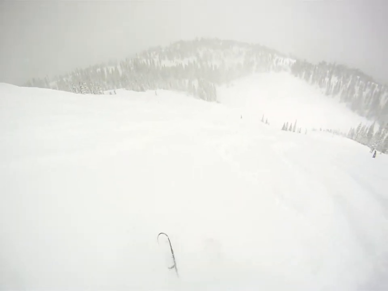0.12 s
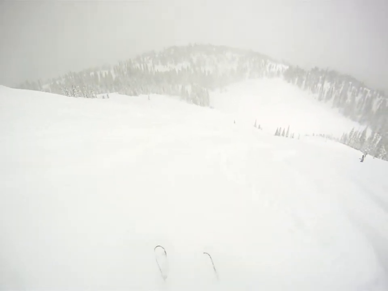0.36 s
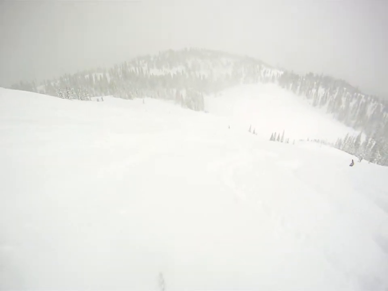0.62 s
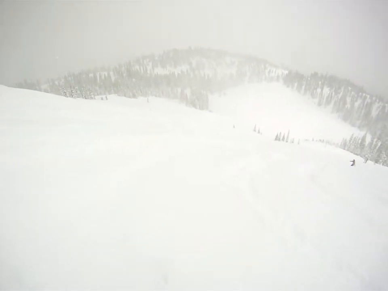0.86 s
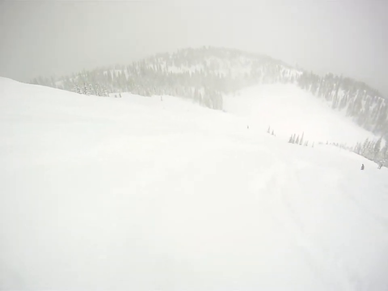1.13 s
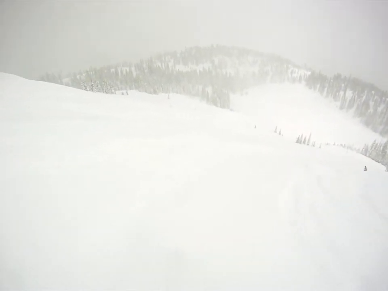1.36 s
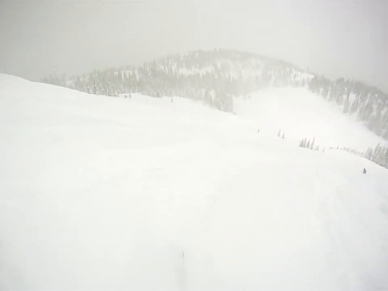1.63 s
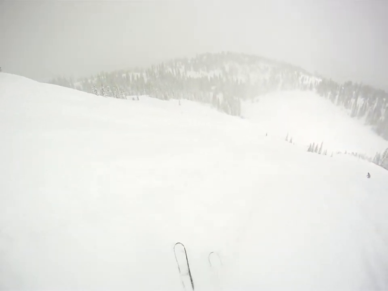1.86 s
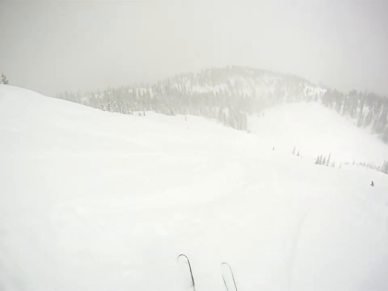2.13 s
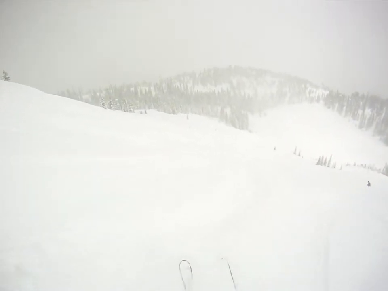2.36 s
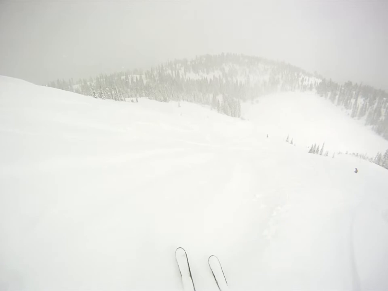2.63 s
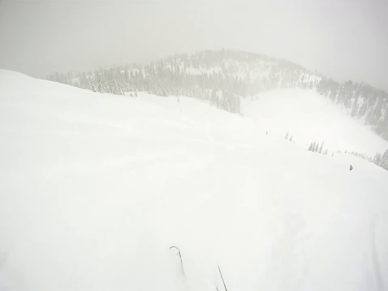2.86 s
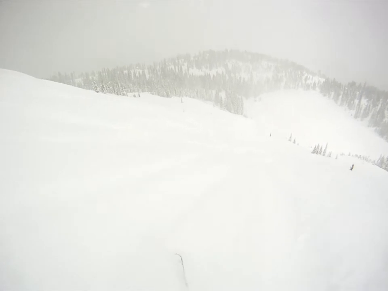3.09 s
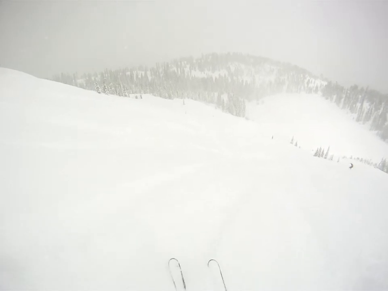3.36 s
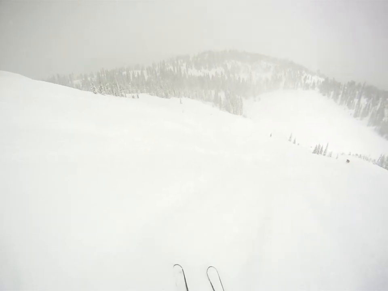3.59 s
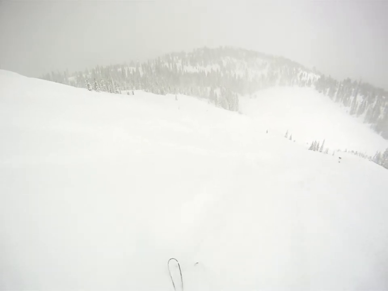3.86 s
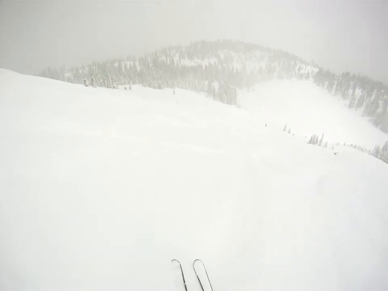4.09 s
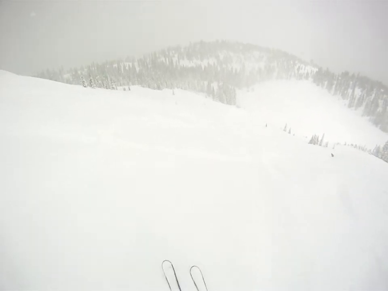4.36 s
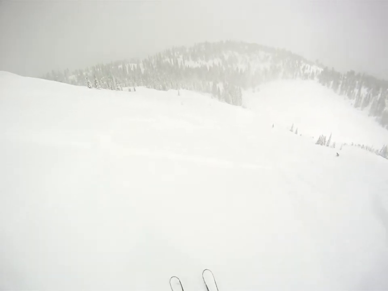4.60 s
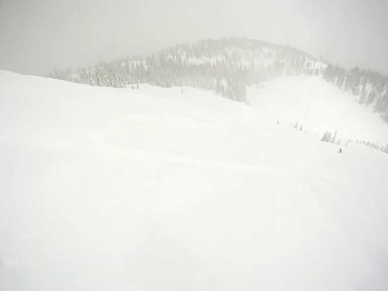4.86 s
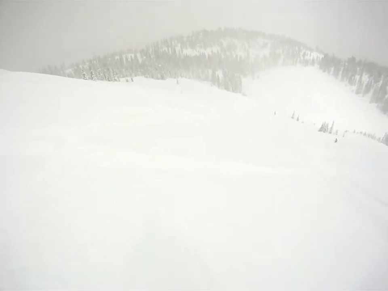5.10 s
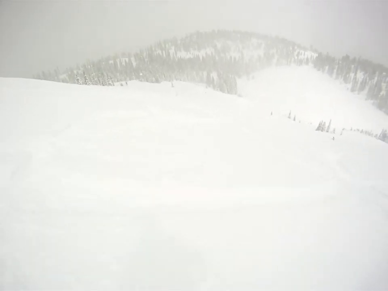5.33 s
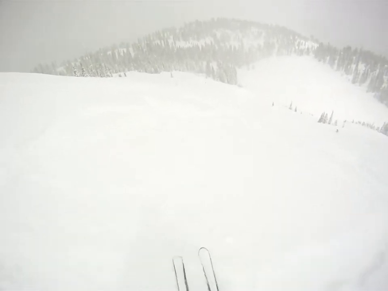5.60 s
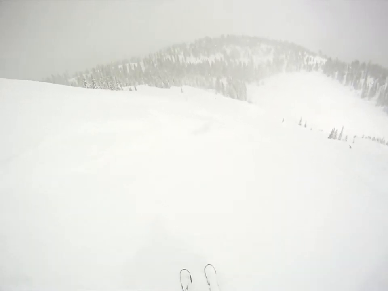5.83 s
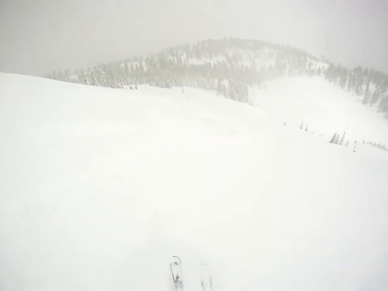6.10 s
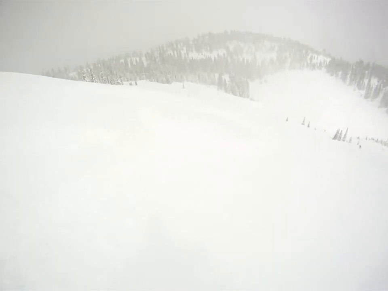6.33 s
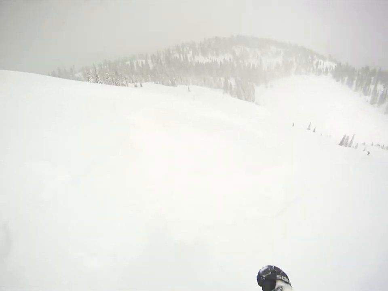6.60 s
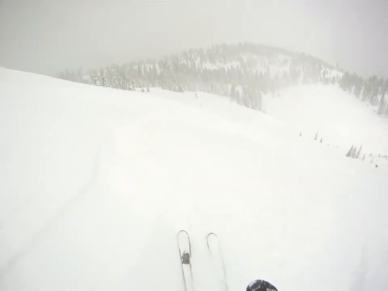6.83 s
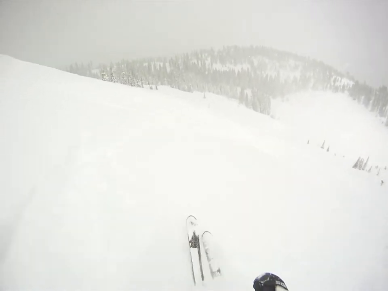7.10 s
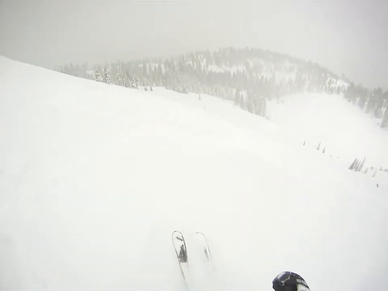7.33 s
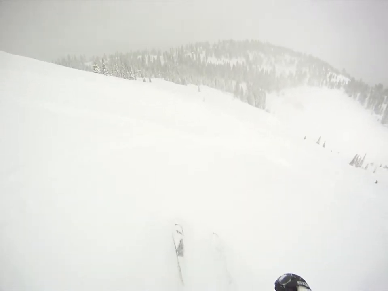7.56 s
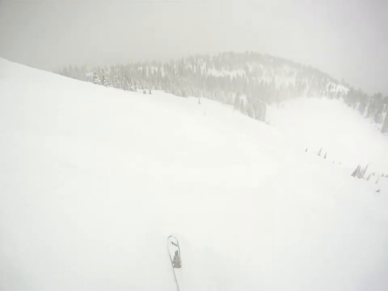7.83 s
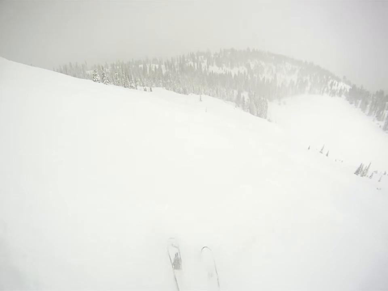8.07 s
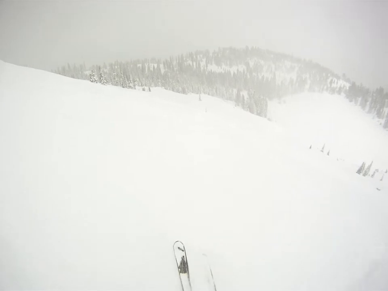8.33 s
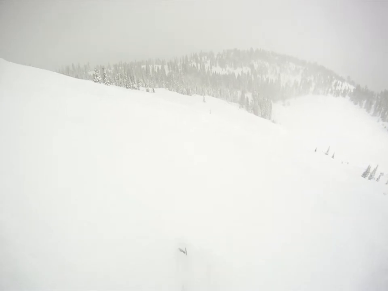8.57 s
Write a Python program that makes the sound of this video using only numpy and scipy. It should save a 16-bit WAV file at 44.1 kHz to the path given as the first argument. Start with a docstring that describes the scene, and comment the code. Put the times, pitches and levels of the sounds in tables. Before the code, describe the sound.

Skiing through deep powder heard from inside a plastic case: thin boxy wind hiss, low buffeting, and crackling snow hits that intensify after five seconds.

```python
"""Rushing air shakes a small plastic case with a microphone shut in it, on a fast ski run in deep powder.
The air gives a low rumble, from noise, and a hiss, from noise through the resonant modes of the shell.
Flying snow patters, ticks and thuds: short pushes ring the same modes; blunt lumps jolt the whole case.
The sound is sampled at 12 kHz and each sample is held, which mirrors it into the treble."""
import sys
import numpy as np
from scipy import signal
from scipy.fft import rfft, irfft
from scipy.io import wavfile

SR = 44100
rng = np.random.default_rng(int(sys.argv[2]) if len(sys.argv) > 2 else 0)


def to_linear_factor(level_db):
    """Convert decibel levels (scalar or array-like) to linear amplitude factors."""
    exponent = np.asarray(level_db, float) / 20
    return 10 ** exponent


def to_wav(sig):
    """Store sig (one row per channel, or 1-D mono) as 16-bit WAV at the path in sys.argv[1].

    Samples outside -1..1 are clipped; the rate is SR.
    """
    pcm = np.clip(np.atleast_2d(sig), -1, 1) * 32767
    pcm = np.round(pcm).astype(np.int16)
    wavfile.write(sys.argv[1], SR, pcm.T)  # frames by channels


N = 383669

# rumble over the run, before gusts: start_s, level_db
RUMBLE_LEVEL = [(0, -48.5), (1.0, -49.5), (2.0, -51), (3.0, -52), (3.7, -48.5), (4.2, -50.5), (5.0, -42),
                (5.5, -44.5), (6.15, -39), (6.8, -42.5), (7.2, -44.5), (7.5, -43), (8.0, -45), (8.5, -43.5),
                (8.7, -45.5)]
# buffeting air spectrum: pitch_hz, gain_db on white noise
BUFFET_SPECTRUM = [(4, -5), (15, -5), (30, -3), (70, -5.5), (140, -10.5), (250, -21), (400, -33.5),
                   (800, -36), (1500, -60)]
# air flow over the run, before AIR_COUPLING_DB: start_s, hiss_db (middle, deep, low), upper_hiss_db (upper, top)
AIR_FLOW = [(0, -47.5, -58), (0.45, -49.5, -60.5), (0.95, -49, -59), (1.72, -52, -57.5), (2.3, -51, -56.5),
            (2.6, -53, -67), (3.25, -55, -63.5), (3.8, -50, -59), (4.3, -47.5, -57), (4.65, -45, -50),
            (4.97, -38.5, -43.5), (5.3, -39.5, -47.5), (5.65, -41.5, -53), (5.98, -36.5, -40),
            (6.18, -38.5, -44), (6.78, -37.5, -43), (7.17, -39.5, -42), (7.5, -38.5, -44), (7.8, -41, -43),
            (8.15, -37.5, -42.5), (8.7, -41.5, -47)]
# shell modes in five groups (middle, deep, low, upper, top): pitch_hz, width_hz, gain_db
SHELL_MODES = [
    [(1733, 153, -4.5), (2033, 270, 0), (2274, 200, -2.5)],
    [(400, 740, -23.5), (639, 90, -14.5), (998, 77, -8.5)],
    [(1275, 101, -2.5), (1517, 226, -6.5)],
    [(2860, 150, -10.5), (3453, 545, 1.5), (4156, 63, -12)],
    [(4490, 350, -21), (5025, 580, -9), (5577, 290, -11)],
]
# drive of each group by air: gain_db for middle, deep, low, upper, top
AIR_COUPLING_DB = [13.74, 14.4, 13.83, 10.55, 9]
# drive of each group by small grains, against air: gain_db for middle, deep, low, upper, top
PATTER_COUPLING_DB = [-0.5, -5.0, -1.5, 5, 8.5]
# drive of each group by a lump or tick: gain_db for middle, deep, low, upper, top
STRIKE_COUPLING_DB = [1.44, 6.1, 7.2, 7.16, 8.1]
# hard icy grains, before STRIKE_COUPLING_DB: start_s, upper_level_db, top_db (against upper)
ICE_TICKS = [(0.0206, -43.5, -13), (0.3671, -43, -12), (0.5422, -57, -2), (0.6357, -39.5, -5),
             (0.7665, -40, -11), (0.9917, -40, -11), (1.1539, -37, -26), (1.258, -42.5, -8),
             (1.3383, -45, -16), (1.4383, -42, -15), (1.657, -48, -5), (1.699, -43, -6), (1.7144, -46, -6),
             (1.7402, -42, -7), (1.8896, -45, -16), (1.956, -42, -27), (2.1809, -45.5, -11.5),
             (2.4121, -44, -19), (2.509, -41.5, -15), (2.7874, -43.5, -13), (2.808, -47, -6),
             (2.8574, -44, -13), (2.9432, -46.5, -9), (3.0146, -44.5, -15), (3.481, -45, -15),
             (3.6915, -44.5, -9), (4.081, -46, -1), (4.124, -47.5, 3.5), (4.1604, -42, -7),
             (4.2115, -41.5, -16), (4.4049, -40, -6), (4.5043, -41, -4), (4.5361, -42, -4),
             (4.6578, -37.5, -14), (5.924, -37, -9), (5.9913, -31, -11), (6.238, -35, -17),
             (6.3576, -32, -17), (6.3874, -31, -15), (6.4378, -29.5, -6), (6.4954, -33.5, -4.5),
             (7.2865, -35, -26.5), (7.647, -34, -21.5), (7.9763, -36, -13), (8.2667, -40, 5)]
# tick colour against its upper modes: gain_db for middle, deep, low
TICK_COLOUR_DB = [3.5, -14, -9.5]
# loudest snow lumps, before STRIKE_COUPLING_DB: start_s, middle_level_db, then against it deep_db, low_db, upper_db
LARGE_LUMPS = [(0.1063, -25.5, -23, -16, -7.5), (0.1276, -32.5, -25.5, -6.5, -18),
               (0.166, -30, -20, -18, -7.5), (0.175, -29.5, -16, -12, -15), (0.3186, -34, -13, -19, -3.5),
               (0.4055, -35.5, -9, -20, -5), (0.629, -30.5, -22, -20, -9), (0.7009, -38.5, -1, -13, -6),
               (0.8659, -33, -18, -2.5, -12), (0.9789, -24, -23, -15.5, -8), (1.1054, -35, -15, -10, -8),
               (1.382, -33, -22, -12, -8), (1.6737, -39.5, -2.5, -12, -4), (1.7688, -37, -19, -9, -17),
               (1.8472, -23, -19, -15, -17), (1.9684, -27.5, -34, -19, -10), (2.245, -36.5, -12, -9, -11),
               (2.3266, -29, -14, -7, -14), (2.755, -28, -18, -6, 1.5), (3.0244, -38, -22, -17, -1.5),
               (3.0737, -36, -19, -17, -12), (3.0959, -33.5, -24, -17, -3.5), (3.4276, -33, -23, -16, -12),
               (3.4575, -32, -17, -13, -14), (3.842, -37, -6, -6, -6), (3.906, -28, -27, -20, -12),
               (3.9649, -31, -15, -13, -12), (4.2875, -32, -23, -17, -8), (4.3216, -32, -19, -19, -4.5),
               (4.37, -26, -27, -16, -17), (4.4241, -26, -22, -11, -15), (4.9292, -29.5, -21, -15, -5),
               (5.1047, -21, -20, -19, -19), (5.5702, -22, -34, -20, -18), (5.6186, -24.5, -29, -15, -13),
               (5.8721, -22.5, -33, -24, -25), (5.903, -21.5, -33, -30, -12), (6.0234, -22, -29, -13, -11),
               (6.0495, -29, -18, -9, 0.5), (6.1016, -26, -27, -18, -1.5), (6.3355, -25, -16, -12, -3),
               (6.566, -20.5, -15, -13, -8), (6.7528, -24, -10, -4, -1), (6.851, -26, -23, -9, -3.5),
               (6.9169, -15.5, -16, -11.5, -8.5), (7.2206, -24.5, -20, -20, -7),
               (7.4987, -21, -28, -19, -14), (7.6058, -19.5, -13.5, -11, -19),
               (7.7097, -21, -21, -5.5, -8.5), (7.749, -21, -35, -9.5, -13), (8.1795, -19, -16.5, -12, -15),
               (8.2928, -18.5, -16, -10, -26), (8.3564, -24.5, -21, -10, -20),
               (8.5026, -23.5, -29, -24, -27), (8.6626, -30, -22, -11, -2.5)]
# soft lumps that ring only the narrowest deep mode: start_s, level_db
SOFT_LUMPS = [(0.704, -44), (1.676, -42), (3.845, -43)]
# blunt lumps that jolt the whole case: start_s, level_db
BLUNT_LUMPS = [(1.847, -39), (2.326, -49), (7.605, -36), (8.179, -40)]

MOUNT_HZ, MOUNT_WIDTH_HZ, MOUNT_GAIN_DB = 113.6, 18.8, 4  # case swinging on its mount
GUST_SPREAD_DB = 0.94
PATTER_PER_S, PATTER_SIZE_SCALE_DB = 100, 3.5  # rate before clumping
PATTER_BASE_DB, PATTER_YIELD = -12, 1.21  # against hiss; dB lost per dB the upper hiss gains
SMALL_PER_S, SMALL_OVER_HISS_DB, SMALL_SPREAD_DB = 30, 2.0, 4.5  # rate before clumping
SMALL_COLOUR_DB, COLOUR_SPREAD_DB = [1, -21.5, -10.5, -9.5, -13.5], 2.5  # per group, as the modes
TOP_UNDER_UPPER_DB = -11  # large lumps ring the top modes less than the upper ones
JOLT_HZ, JOLT_WIDTH_HZ = 380, 430


def rms_one(x):
    """Scale to unit rms."""
    return x / np.sqrt(np.mean(x ** 2) + 1e-20)


def drift(rate_hz):
    """Slow random drift, spread 1: noise through a double one-pole low-pass, at 1/20 rate."""
    r = np.exp(-40 * np.pi * rate_hz / SR)
    noise = rng.standard_normal(N // 20 + 4002)
    slow = signal.lfilter([1], [1, -2 * r, r * r], noise)[4000:]  # run-in dropped
    return np.interp(np.arange(N) / 20, np.arange(len(slow)), rms_one(slow))


def resonance(x, hz, width_hz):
    """Two-pole resonance, peak gain 1."""
    r = np.exp(-np.pi * width_hz / SR)
    poles = [1, -2 * r * np.cos(2 * np.pi * hz / SR), r * r]
    return signal.lfilter([(1 - r * r) / 2, 0, (r * r - 1) / 2], poles, x)


def crumble(clicks, hz, lasts_s):
    """A contact is not instant: each click becomes a push at hz that swells and dies in milliseconds."""
    t = np.arange(256) / SR
    fade = t * np.exp(-t / lasts_s)
    return signal.oaconvolve(clicks, np.cos(2 * np.pi * hz * t) * fade / fade.sum())[:N]


def shell(drive):
    """Sum of the shell modes, in alternating polarity, each rung by drive(group, hz, width_hz)."""
    out, sign = np.zeros(N), 1
    for group, modes in enumerate(SHELL_MODES):
        for hz, width_hz, gain_db in modes:
            out += sign * to_linear_factor(gain_db) * resonance(drive(group, hz, width_hz), hz, width_hz)
            sign = -sign
    return out


def rumble():
    """Buffeting air: falling noise spectrum, lifted where the case swings on its mount; gusty level."""
    hz, gain_db = np.transpose(BUFFET_SPECTRUM)
    bins_hz = np.maximum(np.fft.rfftfreq(N, 1 / SR), 1)
    bin_gain = to_linear_factor(np.interp(np.log(bins_hz), np.log(hz), gain_db))
    buffet = irfft(rfft(rng.standard_normal(N)) * bin_gain, N)
    swing = resonance(rng.standard_normal(N), MOUNT_HZ, MOUNT_WIDTH_HZ)
    level_db = np.interp(np.arange(N) / SR, *np.transpose(RUMBLE_LEVEL)) + GUST_SPREAD_DB * drift(3.6)
    return to_linear_factor(level_db) * rms_one(buffet + to_linear_factor(MOUNT_GAIN_DB) * swing)


def flow_db(group, hiss_db, upper_db):
    """Air drive of a group: the upper and top groups follow the upper hiss."""
    return AIR_COUPLING_DB[group] + (hiss_db if group < 3 else upper_db)


def air_hiss(hiss_db, upper_db):
    """Air noise drives every shell mode, with shared flutter and a slow drift per mode."""
    flutter_db = 0.47 * drift(3.6) + 1.0 * drift(63)

    def drive(group, hz, width_hz):
        level_db = flow_db(group, hiss_db, upper_db) + flutter_db + 1.8 * drift(4.0)
        return to_linear_factor(level_db) * rng.standard_normal(N)
    return shell(drive)


def patter(hiss_db, upper_db):
    """Fine snow in clumps, few large grains among many small, each with its own strength per mode."""
    at = np.flatnonzero(rng.random(N) < PATTER_PER_S * to_linear_factor(2.5 * drift(15)) / SR)
    size_db = PATTER_SIZE_SCALE_DB * np.minimum(-np.log(1 - rng.random(len(at))), 2.6)
    size = to_linear_factor(size_db) * np.sign(rng.random(len(at)) - .5)
    # where a grain lands favours some groups
    spot_db = 3.3 * rng.standard_normal((len(SHELL_MODES), len(at)))
    patter_db = PATTER_BASE_DB + PATTER_YIELD * (hiss_db - upper_db)

    def drive(group, hz, width_hz):
        grains = np.zeros(N)
        grains[at] = size * to_linear_factor(spot_db[group] + 1.0 * rng.standard_normal(len(at)))
        level_db = flow_db(group, hiss_db, upper_db) + patter_db + PATTER_COUPLING_DB[group]
        return to_linear_factor(level_db) * crumble(rms_one(grains), hz, lasts_s=0.00016)
    return shell(drive)


def strike(start_s, group_db):
    """Each contact lands, then sheds three weaker crumbs; all ring the shell, unevenly per mode."""
    count = len(start_s)
    draw = rng.random((count, 3, 3))
    late_s = np.c_[np.zeros(count), .0016 + .005 * draw[..., 0] ** 2]
    weaker_db = np.c_[np.zeros(count), -11.0 - 9.0 * draw[..., 1]]
    signs = np.c_[np.ones(count), np.sign(draw[..., 2] - .5)].ravel()
    at = np.round((start_s[:, None] + late_s) * SR).astype(int).ravel()
    contact_db = (group_db + STRIKE_COUPLING_DB)[:, None] + weaker_db[..., None]
    contact_db = contact_db.reshape(len(at), -1)

    def drive(group, hz, width_hz):
        loudest_mode_db = np.max(SHELL_MODES[group], axis=0)[-1]
        clicks = np.zeros(N)
        clicks[at] = signs * to_linear_factor(contact_db[:, group] - loudest_mode_db)
        clicks[at] *= to_linear_factor(1.07 * rng.standard_normal(N))[at]
        # narrow modes take less of a blow and ring longer
        return crumble(clicks, hz, lasts_s=0.0002) * SR / (np.pi * np.sqrt(250 * width_hz))
    return shell(drive)


def small_lumps(hiss_db):
    """Random smaller lumps, in clumps, as strong as the flow, each with its own colour."""
    usable = N - SR // 100  # room for the crumbs
    chance = SMALL_PER_S * to_linear_factor(3.0 * drift(4.0))[:usable] / SR
    at = np.flatnonzero(rng.random(usable) < chance)
    draw = np.clip(rng.standard_normal((len(at), 6)), -2, 1.3)
    level_db = hiss_db[at] + SMALL_OVER_HISS_DB + SMALL_SPREAD_DB * draw[:, 0]
    return strike(at / SR, level_db[:, None] + SMALL_COLOUR_DB + COLOUR_SPREAD_DB * draw[:, 1:])


def ice_ticks():
    """Hard icy grains strike the shell and ring mostly its treble modes."""
    start_s, upper_level_db, top_db = np.transpose(ICE_TICKS)
    colour_db = np.c_[np.tile([*TICK_COLOUR_DB, 0], (len(start_s), 1)), top_db]
    return strike(start_s, upper_level_db[:, None] + colour_db)


def large_lumps():
    """The loudest lumps of snow strike the shell, each with its own balance of modes."""
    start_s, middle_level_db, deep_db, low_db, upper_db = np.transpose(LARGE_LUMPS)
    colour_db = np.c_[np.zeros(len(start_s)), deep_db, low_db, upper_db, upper_db + TOP_UNDER_UPPER_DB]
    return strike(start_s, middle_level_db[:, None] + colour_db)


def thump(rows, hz, width_hz, lasts_s):
    """A push at each row's time rings one resonance."""
    start_s, level_db = np.transpose(rows)
    clicks = np.zeros(N)
    clicks[(start_s * SR).astype(int)] = to_linear_factor(level_db) * SR / (np.pi * width_hz)
    return resonance(crumble(clicks, hz, lasts_s), hz, width_hz)


def soft_tocks():
    """Soft lumps press longer, so ring only the narrowest deep mode."""
    hz, width_hz, _ = SHELL_MODES[1][-1]
    return thump(SOFT_LUMPS, hz, width_hz, lasts_s=.0012)


def jolts():
    """Blunt lumps push the whole case: one damped thump each."""
    return thump(BLUNT_LUMPS, JOLT_HZ, JOLT_WIDTH_HZ, lasts_s=.00015)


def scene():
    """Rumble, hiss and snow follow the speed of the run."""
    start_s, *levels = np.transpose(AIR_FLOW)
    hiss_db, upper_db = [np.interp(np.arange(N) / SR, start_s, level) for level in levels]
    mix = rumble() + air_hiss(hiss_db, upper_db) + patter(hiss_db, upper_db)
    mix += small_lumps(hiss_db) + ice_ticks() + large_lumps()
    mix += soft_tocks() + jolts()
    return mix[None]


def top_cut(x):
    """Nothing passes above the cut-off."""
    return signal.sosfilt(signal.butter(12, 16490, fs=SR, output="sos"), x)


def record(dry):
    """Steep but shallow low-pass, 12 kHz sampling, each sample held four times over, then a top cut."""
    smooth = signal.sosfilt(signal.cheby2(4, 10, 5850, fs=SR, output="sos"), dry)
    sampled = signal.resample_poly(smooth, 160, 147, axis=1)[:, ::4]  # 48 kHz, every fourth kept
    held = np.repeat(sampled, 4, axis=1)
    back = signal.resample_poly(held, 147, 160, axis=1)[:, :N]
    back = np.pad(back, ((0, 0), (0, N - back.shape[1])))
    mix = signal.sosfilt(signal.ellip(10, .3, 33, 15280, fs=SR, output="sos"), back)
    return top_cut(mix)


dry = scene()
out = record(dry)
to_wav(out)
```